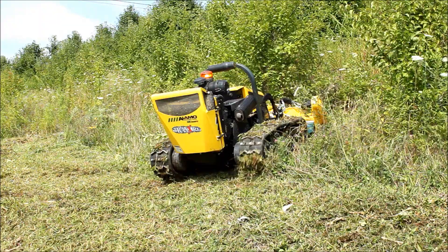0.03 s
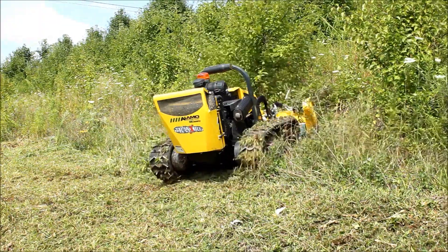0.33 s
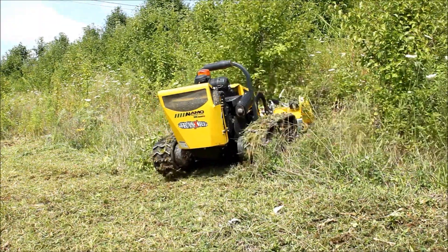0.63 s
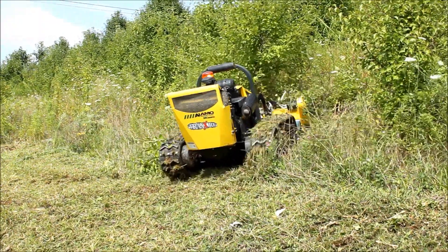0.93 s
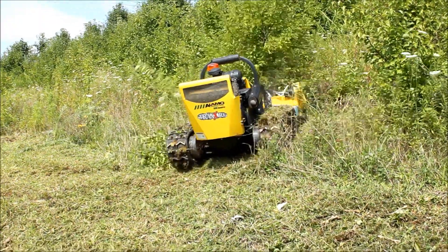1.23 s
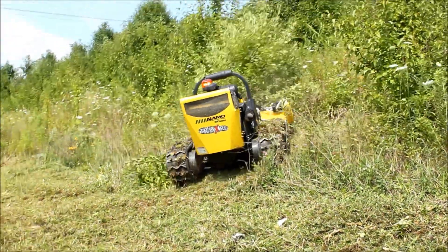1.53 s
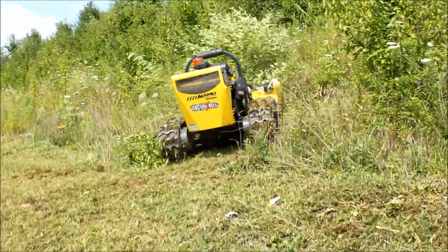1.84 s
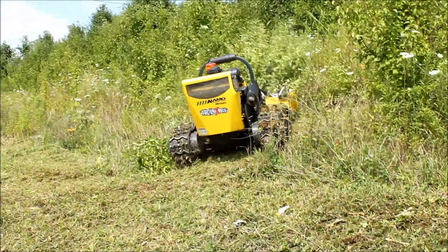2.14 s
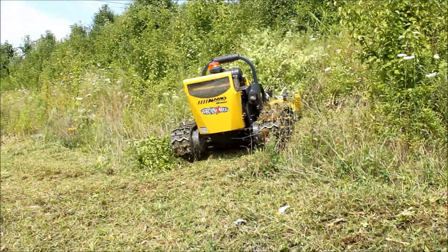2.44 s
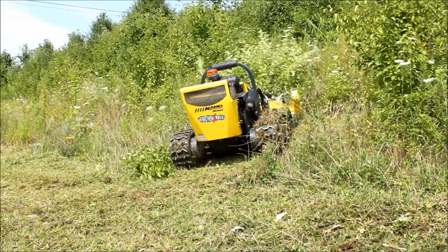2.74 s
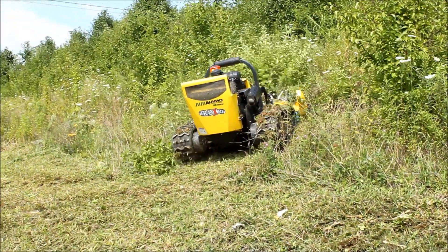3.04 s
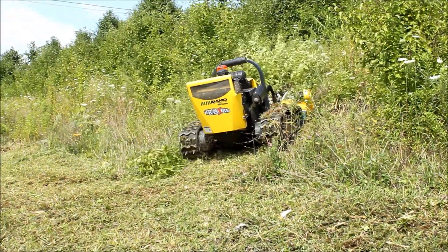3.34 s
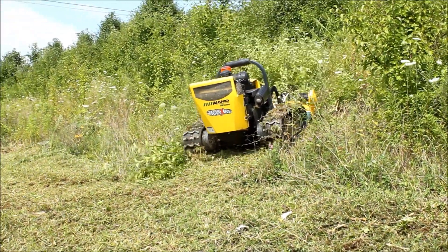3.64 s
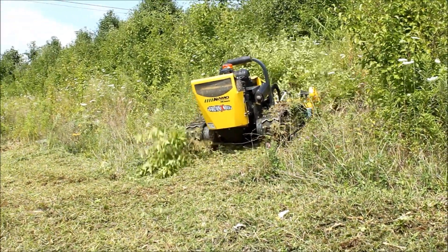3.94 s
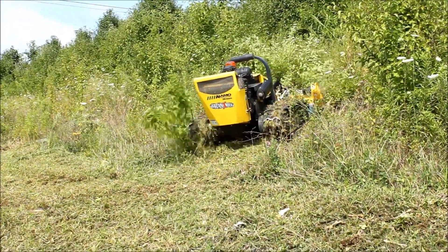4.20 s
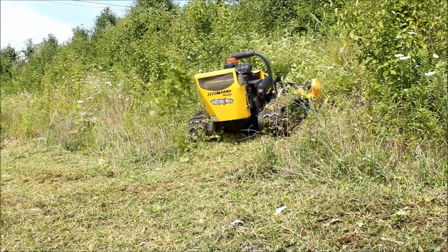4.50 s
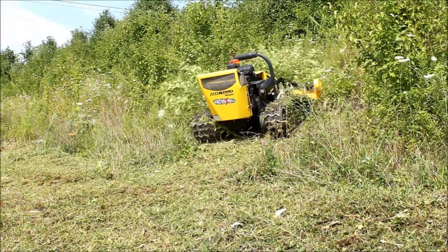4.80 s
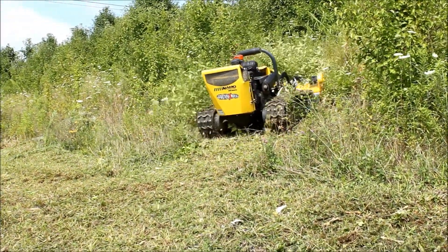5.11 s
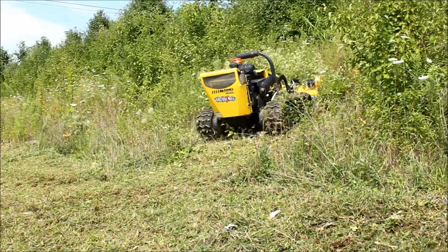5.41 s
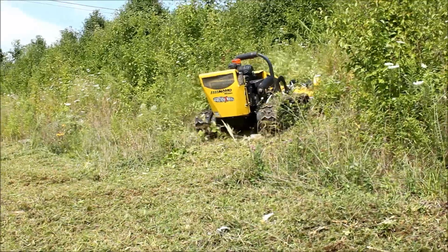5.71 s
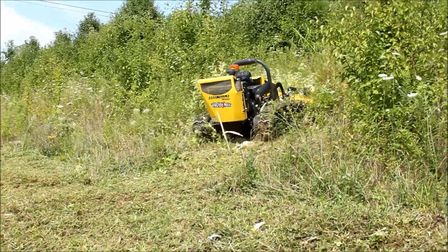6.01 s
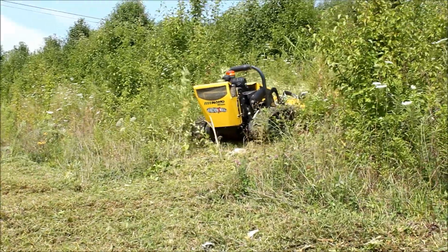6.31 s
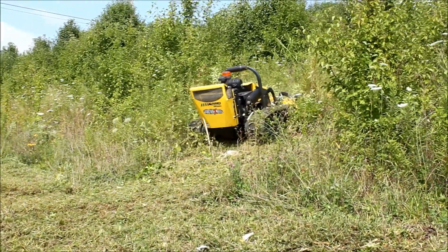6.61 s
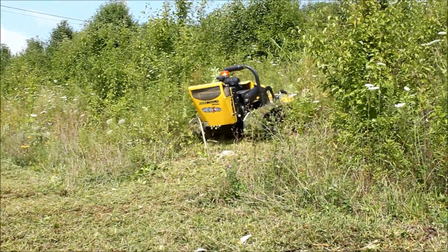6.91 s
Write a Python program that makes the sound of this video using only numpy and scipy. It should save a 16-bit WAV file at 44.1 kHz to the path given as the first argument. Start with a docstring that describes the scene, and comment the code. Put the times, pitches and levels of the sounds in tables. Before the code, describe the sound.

The steady drone of a diesel brush mower rises gradually from silence, heard through one microphone in the open air. A fan whines and a rotor hums beneath the hiss and crackle of weeds being shredded. Early on, stems crack and the steel hood booms. The engine dips and recovers in each patch of thick growth, then labours hardest near the end, after a cluster of sharp woody snaps.

```python
"""A weedy hillside in the open air, one microphone, a tracked diesel mower working its way up.
Three cylinders drone through a muffler, each firing with a rasp of gas, over the cooling fan's whine.
Each thicket drags on the flail rotor, the engine sags and the governor opens up. Stalks shred,
woody stems snap and the steel hood booms. It fades in over the first seconds."""
import sys
import numpy as np
from scipy import signal
from scipy.fft import rfft, irfft, next_fast_len
from scipy.io import wavfile

SR = 44100
rng = np.random.default_rng(int(sys.argv[2]) if len(sys.argv) > 2 else 0)


def digitize_waveform(pressure):
    """Quantize a signal to 16-bit integers and store it at the path in sys.argv[1].

    Rows of a 2-D input are taken as channels; values are limited to [-1, 1].
    """
    field = np.atleast_2d(pressure).T
    bounded = np.clip(field, -1, 1)
    quanta = np.round(bounded * 32767).astype(np.int16)
    wavfile.write(sys.argv[1], SR, quanta)


N = 306495
TIME = np.arange(N) / SR

# cooling fan, reaching the microphone through the grille as the machine turns: time_s, level_db
FAN_LEVEL = [(0, 9), (1.0, 3), (2.0, 5), (2.8, 0), (3.7, 6), (4.5, 1), (5.1, -6), (5.5, -9), (6.0, -5.5),
             (6.95, -3.5)]
# air driven through the grille: frequency_hz, density_db
FAN_AIR_SPECTRUM = [(250, -25), (480, -12), (580, 2.5), (720, -1.5), (860, 0), (1060, -6), (1400, -4.5),
                    (2000, 0), (3500, -30)]
# fan whine: firing_multiple
WHINE_ORDERS = [9, 11, 12, 18, 36]
# each tone of that whine: level_db
WHINE_LEVELS = [-53, -47, -43.5, -46.5, -48]

# growth that brakes the rotor: middle_s, length_s, drag_firings_per_s, din_rise_db
THICKET_PATCHES = [(0.11, .81, 1.09, 2.8), (0.86, .7, 1.76, 3.8), (2.26, .63, 6.01, 2.6),
                   (3.41, .85, 1.35, 2.8), (4.27, .2, 3.21, 4.8), (4.9, .41, 3.04, 3.3),
                   (5.34, .64, 6.8, 3.6), (5.64, 4.01, 4.29, 2.1), (6.35, .21, 2.53, 2.2)]
# din of engine block, rotor air and cutting: frequency_hz, density_db
DIN_SPECTRUM = [(40, -41), (110, 1), (200, -1), (330, 3.5), (490, -7), (860, 1.5), (1070, -13), (1400, -2),
                (1850, -8.5), (2400, -1.5), (4000, 1), (6300, -13), (8200, -15.5), (11800, -13),
                (16000, -28)]
# shredding stalks: frequency_hz, density_db
SHRED_SPECTRUM = [(500, -15.5), (2000, -0.5), (3700, 6.5), (6200, -0.5), (8200, -12), (11500, -5.5),
                  (16000, -14)]
# woody stems snapping: start_s, level_db, decay_s
STEM_SNAPS = [(0.665, -17.5, 0.0086), (0.85, -21, 0.065), (1.963, -15.5, 0.031), (2.158, -16.5, 0.047),
              (3.059, -17.5, 0.01), (4.156, -14.5, 0.01), (4.213, -20, 0.073), (5.155, -16, 0.013),
              (5.183, -18, 0.022), (5.276, -10.5, 0.0035), (5.314, -22.5, 0.022), (5.851, -30, 0.013),
              (5.892, -30, 0.0026), (6.028, -24, .011)]
# low booms from the hood, the first a brief swell of the rotor's hum:
# middle_s, length_s, pitch_hz, level_db
LOW_BOOMS = [(0.682, 0.15, 107.7, -40), (2.085, 0.2, 152.2, -25), (2.18, .1, 140.4, -18),
             (2.24, .06, 136.5, -24), (4.2, .12, 139.4, -33), (4.86, 0.16, 137.2, -28.5),
             (5.16, .22, 138.8, -37), (6.24, 0.17, 138.6, -31.5)]
# modes of the steel hood: pitch_multiple, level_db
HOOD_MODES = [(0.998, 2.5), (1.899, -13), (2.95, -13), (4.699, -18)]
# flail rotor tones: row_multiple, free_db, full_hood_gain_db, sag_loss_db (per firing/s of sag)
FLAIL_TONES = [(1, -48.5, 16.5, 3.6), (2, -29, -1, 1), (4, -37.5, -5.5, 0.34)]
# the highest rotor tone, a hollow hum that stands out in light growth: time_s, gain_db
HOLLOW_HUM_GAIN = [(0.6, -3), (1.15, 4.5), (1.9, 3.5), (3, -4), (4.3, 0), (6.95, -4.5)]

# ring of the engine cover: time_s, level_db
COVER_RING_LEVEL = [(0, -18), (1.7, -1.5), (2.4, -20), (3.5, 1.5), (4.5, -6), (5.3, -22), (5.9, -12),
                    (6.95, -7)]
# gas rasp at the tail pipe: frequency_hz, density_db
RASP_SPECTRUM = [(300, -29), (800, -7.5), (1100, -7.5), (1400, -5), (1850, -9.5), (2350, 0.5), (3100, -2),
                 (4000, -1), (5000, -8), (6200, -8.5), (7200, -18), (8800, -18), (11000, -9),
                 (16000, -18.5)]
# each cylinder's rasp: level_db
CYLINDER_LEVELS = [1.0, -0.72, .2]
# exhaust tones, sliding to or from the muffler's resonance as the engine slows:
# firing_multiple, level_db, sag_gain_db (per firing/s of sag)
EXHAUST_TONES = [(1, -13.5, -0.54), (2, 1.5, -0.56), (3, -6.5, 0.01), (4, -18.5, 0.3), (5, -23.5, 0)]

FREE_FIRINGS_PER_S, FLYWHEEL_S, START_PHASE = 78.005, .18, .476  # sag is the drop below this free speed
GOVERNOR_SPAN, GOVERNOR_S = 1.98, 0.0085  # sag that mostly opens the throttle (firings/s); its lag
BELT_RATIO, BELT_SLIP = 1.362, .62  # flail rows per firing; rows/s lost per unit of drag
HOOD_FULL_DRAG = 0.9  # drag at which the hood is mostly full of grass (firings/s)
CUT_LEAD_S, CUT_SHARE = 0.1, 0.98  # stalks are cut before their mulch drags, for a share of that time
DRONE_DB, DRONE_THROTTLE_DB = -26, 0.5  # gain running free; added at full throttle
RASP_DB, RASP_THROTTLE_DB = -30.5, 7.5
RASP_SAG_DB, DIN_SAG_DB = 0.58, 0.95  # a labouring machine is quieter: loss per firing/s of sag
FADE_FROM_S, FADE_LENGTH_S, CUTOFF_HZ = 0.11, 4.46, 15800


def from_db(db):
    """Decibels to gain."""
    return 10 ** (np.asarray(db) / 20)


def rms_one(x):
    """Scale to unit power."""
    return x / np.sqrt(np.mean(x ** 2) + 1e-20)


def in_time(curve):
    """A level curve read at every sample."""
    return np.interp(TIME, *np.transpose(curve))


def gain_at(spectrum, hz):
    """A spectrum's gain, read on a log-frequency axis."""
    points_hz, points_db = np.transpose(spectrum)
    return from_db(np.interp(np.log(hz + 1e-9), np.log(points_hz), points_db))


def colour(x, spectrum):
    """Filter a signal by a spectrum; rms 1."""
    size = next_fast_len(N + 4096)
    gain = gain_at(spectrum, np.fft.rfftfreq(size, 1 / SR))
    return rms_one(irfft(rfft(x, size) * gain, size)[:N])


def drift(rate_hz, step=40, settle=2000):
    """A smooth random wander with a spread of 1."""
    pole = np.exp(-2 * np.pi * step * rate_hz / SR)
    noise = rng.standard_normal(N // step + settle + 2)
    slow = signal.lfilter([1], [1, -2 * pole, pole * pole], noise)[settle:]
    return np.interp(np.arange(N) / step, np.arange(len(slow)), rms_one(slow))


def resonate(x, hz, width_hz):
    """A two-pole resonance with gain 1 at its peak."""
    radius = np.exp(-np.pi * width_hz / SR)
    feedback = [1, -2 * radius * np.cos(2 * np.pi * hz / SR), radius ** 2]
    return signal.lfilter(np.array([1, 0, -1]) * (1 - radius ** 2) / 2, feedback, x)


def per_firing(firings):
    """One random value for each firing."""
    return rng.standard_normal(int(firings[-1]) + 2)


def arch(middle_s, length_s):
    """Half a cosine wave that swells to 1 and falls again."""
    return np.cos(np.pi * np.clip((TIME - middle_s) / length_s, -.5, .5))


def lagging(x, lag_s):
    """Follow a control with some inertia."""
    pole = np.exp(-1 / (lag_s * SR))
    return signal.lfilter([1 - pole], [1, -pole], x)


def hillside(x, scatter_db=-12, decay_s=0.007, path_wander_s=.0004):
    """Ground and bushes add a short scatter; its path to the microphone shifts as the machine moves."""
    t = TIME[:SR // 10]
    tail = rng.standard_normal(len(t)) * np.exp(-t / decay_s)
    scatter = signal.fftconvolve(x, tail / np.sqrt(np.sum(tail ** 2)))[:N]
    delay_s = path_wander_s * np.abs(3 + drift(1))
    return x + from_db(scatter_db) * np.interp(TIME - delay_s, TIME, scatter)


def fan(firings, air_db=-36.5, waver_db=2.1, whine_db=1.5, whine_follows=0.73):
    """Fan blades and their drive sing at multiples of the engine speed, over a rush of air."""
    level_db, whine = in_time(FAN_LEVEL), 0
    for order, db in zip(WHINE_ORDERS, WHINE_LEVELS):
        phase = 2 * np.pi * order * firings + drift(15) / 3
        whine += from_db(db + waver_db * drift(5.0)) * np.sin(phase)
    air = from_db(air_db + level_db) * colour(rng.standard_normal(N), FAN_AIR_SPECTRUM)
    return from_db(whine_db + whine_follows * level_db) * np.sqrt(2) * whine + air


def cutting_level(sag, waver_db=0.96):
    """Level of the cutting din about its mean (dB): up in each thicket, down as the machine slows."""
    din_db = sum(db * arch(s - CUT_LEAD_S, CUT_SHARE * length) for s, length, _, db in THICKET_PATCHES)
    din_db -= DIN_SAG_DB * sag
    return din_db - din_db.mean() + waver_db * drift(3.7)


def air_rush(din_db, level_db=-28.5, flicker_db=0.69):
    """A broad rush of air that follows the cutting."""
    gain = from_db(level_db + din_db + flicker_db * drift(23))
    return gain * colour(rng.standard_normal(N), DIN_SPECTRUM)


def twigs(din_db, per_s=70, level_db=-39, spread_db=5.0, decay_s=0.00046):
    """Flung bits of twig tick against the hood at random, harder in thick growth."""
    hits = (rng.random(N) < per_s / SR) * from_db(spread_db * np.minimum(rng.exponential(1, N), 2))
    ticks = signal.lfilter([1], [1, -np.exp(-1 / (decay_s * SR))], hits + 1e-18)
    return from_db(level_db + .5 * din_db) * colour(ticks * rng.standard_normal(N), SHRED_SPECTRUM)


def shredding(din_db, per_s=1500, level_db=-34, spread_db=1.0, clump_db=3):
    """Stalks break in clumps of tiny cracks, denser and louder the harder the machine cuts."""
    rate = per_s * from_db(din_db + clump_db * drift(30))
    sizes = from_db(spread_db * np.minimum(rng.exponential(1, N), 4)) * rng.choice([-1, 1], N)
    cracks = sizes * (rng.random(N) < rate / SR)
    return from_db(level_db + 0.77 * din_db) * colour(cracks, SHRED_SPECTRUM)


def snaps(splinter_db=4):
    """A woody stem bursts into splinters that die away at once."""
    bursts = sum(from_db(db) * (TIME >= start_s) * np.exp(-np.abs(TIME - start_s) / decay_s)
                 for start_s, db, decay_s in STEM_SNAPS)
    splinters = rng.standard_normal(N) * from_db(splinter_db * drift(610))
    return bursts * colour(splinters, SHRED_SPECTRUM)


def hood(glide_hz=28, stagger=0.36, rumble_db=-12):
    """Rough, low booms from the hood, falling in pitch; the first is a brief swell of the rotor's hum."""
    out = np.zeros(N)
    rumble = colour(rng.standard_normal(N), [(50, -34), (150, 1), (700, 13), (2000, -45)])
    for middle_s, length_s, pitch_hz, db in LOW_BOOMS:
        during = np.abs(TIME - middle_s) < length_s / 2
        progress = (TIME[during] - middle_s) / length_s  # -0.5 to 0.5
        phase = 2 * np.pi * np.cumsum(pitch_hz - glide_hz * progress) / SR
        phase += stagger * np.cumsum(rng.standard_normal(during.sum())) * np.sqrt(20 / SR)
        boom = sum(from_db(mode_db) * np.sin(multiple * phase) for multiple, mode_db in HOOD_MODES)
        swell = from_db(db) * np.cos(np.pi * progress)
        out[during] += swell * (np.sqrt(2) * boom + from_db(rumble_db) * rumble[during])
    return out


def rotor(speed, drag, sag, waver_db=2.0, jitter_rad=0.41):
    """Flail rows sweep past the hood and hum; grass slips the belt, deepens the hum and damps its top."""
    row_phase = 2 * np.pi * np.cumsum(BELT_RATIO * speed - BELT_SLIP * drag) / SR
    fullness, hum = np.tanh(drag / HOOD_FULL_DRAG), 0
    extras_db = (0, 0, in_time(HOLLOW_HUM_GAIN))
    for (multiple, free_db, full_db, sag_db), extra_db in zip(FLAIL_TONES, extras_db):
        level_db = free_db + extra_db + full_db * fullness - sag_db * sag + waver_db * drift(6.9)
        hum += from_db(level_db) * np.sin(multiple * row_phase + jitter_rad * drift(19))
    return np.sqrt(2) * hum


def labour():
    """Growth drags on the rotor, the engine sags after it, and the governor opens the throttle (0-1)."""
    drag = sum(pull * arch(s, length) for s, length, pull, _ in THICKET_PATCHES)
    sag = lagging(drag, FLYWHEEL_S)
    throttle = lagging(np.tanh(sag / GOVERNOR_SPAN), GOVERNOR_S)
    return drag, sag, throttle


def cover_ring(x, ring_hz=2400, width_hz=420, waver_db=1.0):
    """The steel engine cover rings with the rattle, now more, now less."""
    ring_db = in_time(COVER_RING_LEVEL) + waver_db * drift(6.2)
    return x + from_db(ring_db) * resonate(x, ring_hz, width_hz)


def clatter(firings, level_db=-38.5, waver_db=3.9, lowest_hz=450, size=8192, count=130):
    """Valves and injectors repeat one rattle every three firings, a comb of close lines."""
    gain = from_db(level_db + waver_db * drift(4.0))
    cycles = firings / len(CYLINDER_LEVELS)
    hz = np.arange(count) * cycles[-1] / TIME[-1]
    lines = gain_at(DIN_SPECTRUM, hz) * (hz > lowest_hz) * np.exp(2j * np.pi * rng.random(count))
    rattle = irfft(lines, size)
    return gain * rms_one(np.interp(cycles % 1 * size, np.arange(size), rattle))


def lope(firings, level_db=-42, waver_db=2):
    """Unequal cylinders add weak tones at thirds of the firing rate, just above its third multiple."""
    cycle_phase = 2 * np.pi * firings / len(CYLINDER_LEVELS)
    tones = .5 * np.sin(10 * cycle_phase) + np.sin(11 * cycle_phase)
    return from_db(level_db + waver_db * drift(8.4)) * tones


def rasp(firings, peak_share=0.2, sharpness=1.72):
    """Each opening of an exhaust valve lets out a jet that swells fast and dies within the firing."""
    age = firings % 1 / peak_share
    jet = (age * np.exp(1 - age)) ** sharpness
    cylinder = firings.astype(int) % len(CYLINDER_LEVELS)
    return colour(rng.standard_normal(N) * jet * from_db(CYLINDER_LEVELS)[cylinder], RASP_SPECTRUM)


def exhaust(firings, sag, load_db, muffler_hz=168, width_hz=75, uneven_db=.5, brightening=0.49):
    """Low harmonics of the firing pulses, each delayed by the muffler's resonance."""
    firing_hz, drone = np.gradient(firings) * SR, 0
    for order, db, sag_db in EXHAUST_TONES:
        hz = order * firing_hz
        lag = np.arctan2(hz * width_hz, muffler_hz ** 2 - hz ** 2)
        # load brings out the harmonics on either side of the strong second one
        level_db = db + sag_db * sag + brightening * abs(np.log2(order / 2)) * load_db
        drone += from_db(level_db) * np.cos(2 * np.pi * order * firings - lag)
    strength_db = uneven_db * per_firing(firings)
    return np.sqrt(2) * drone * from_db(np.interp(firings, np.arange(len(strength_db)), strength_db))


def scene():
    """Engine, rotor and cutting at one microphone in the open, driven by the growth in the mower's way."""
    drag, sag, throttle = labour()
    speed = FREE_FIRINGS_PER_S - sag
    firings = np.cumsum(speed) / SR + START_PHASE  # running count
    rasp_db = RASP_DB + RASP_THROTTLE_DB * throttle - RASP_SAG_DB * sag + 0.2 * drift(7.5)
    din_db = cutting_level(sag)
    drone_db = DRONE_DB + DRONE_THROTTLE_DB * throttle + 0.96 * drift(3.5)
    drone = from_db(drone_db) * exhaust(firings, sag, load_db=rasp_db - rasp_db.mean()) + lope(firings)
    engine = cover_ring(from_db(rasp_db) * rasp(firings) + clatter(firings))
    cutting = air_rush(din_db) + shredding(din_db) + twigs(din_db) + snaps()
    direct = fan(firings) + hood() + rotor(speed, drag, sag) + drone
    return (direct + hillside(engine + cutting))[None]


def record(dry):
    """The sound comes up in a straight fade, and the very top of the treble is cut."""
    fade = np.clip((TIME - FADE_FROM_S) / FADE_LENGTH_S, 0, 1)
    top_cut = signal.ellip(12, .1, 90, CUTOFF_HZ, fs=SR, output="sos")
    return signal.sosfilt(top_cut, dry * fade)


dry = scene()
out = record(dry)
digitize_waveform(out)
```